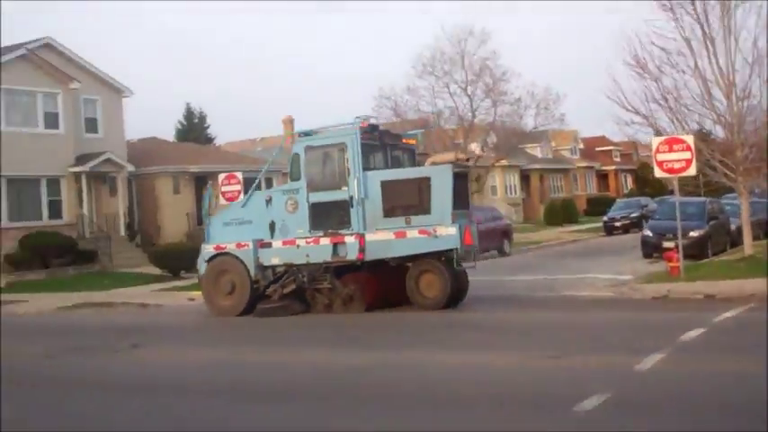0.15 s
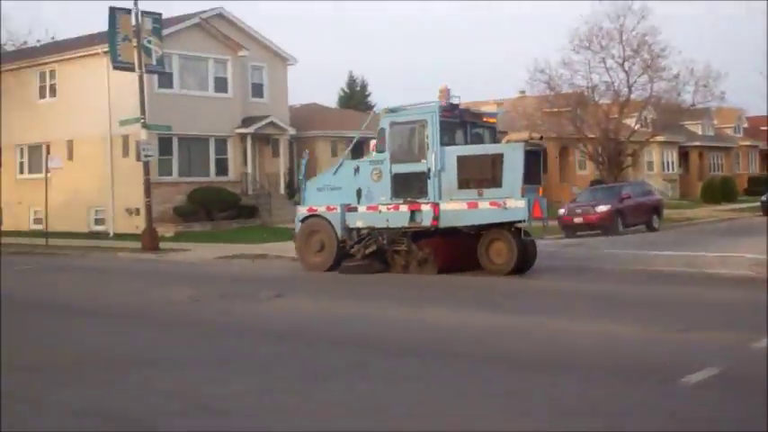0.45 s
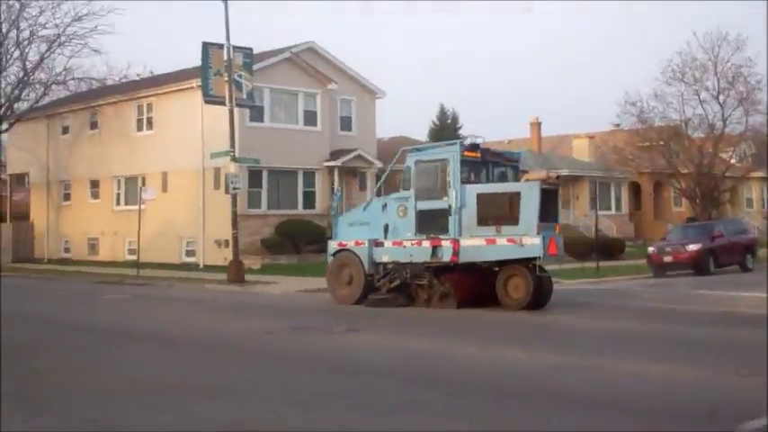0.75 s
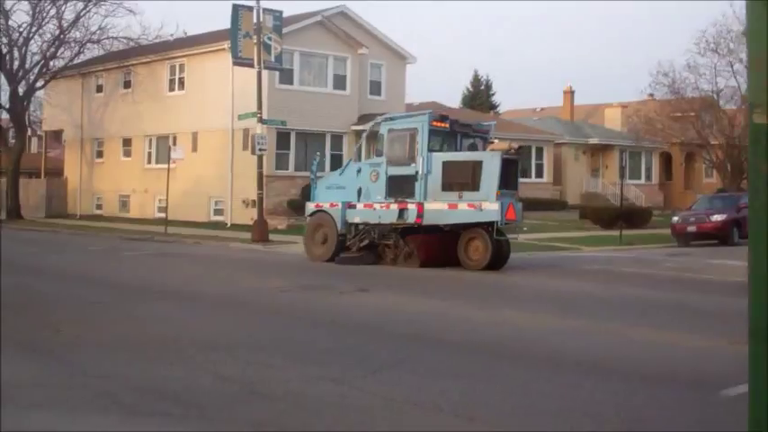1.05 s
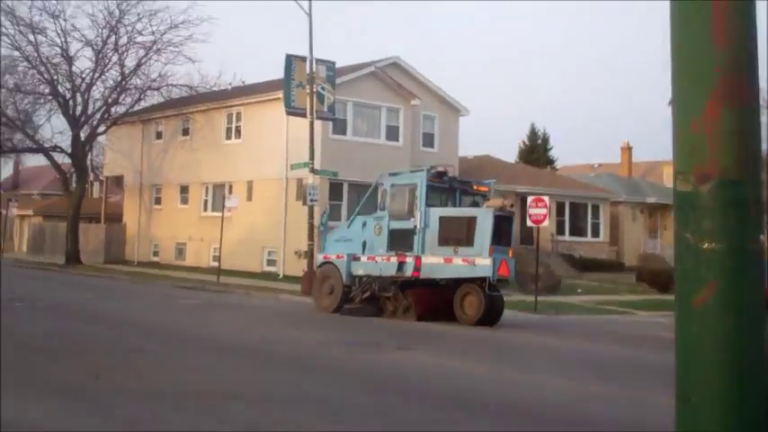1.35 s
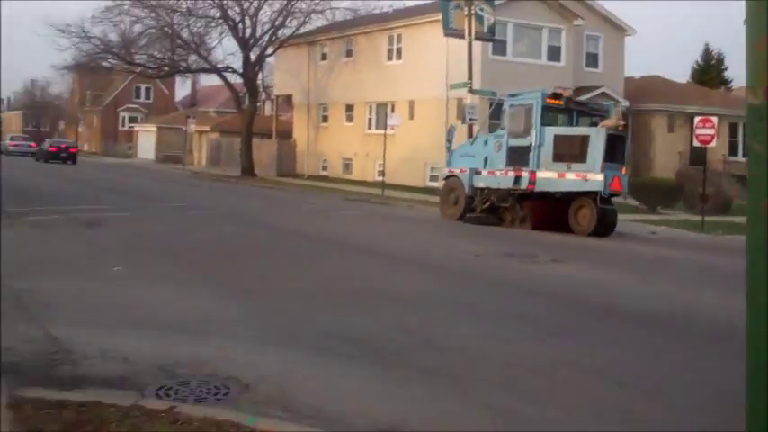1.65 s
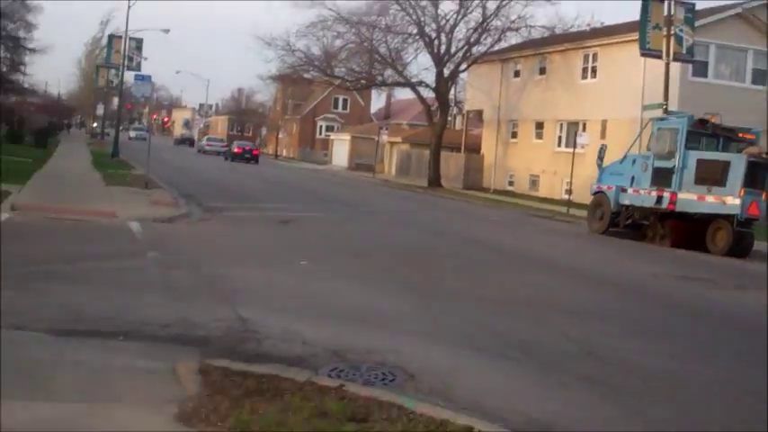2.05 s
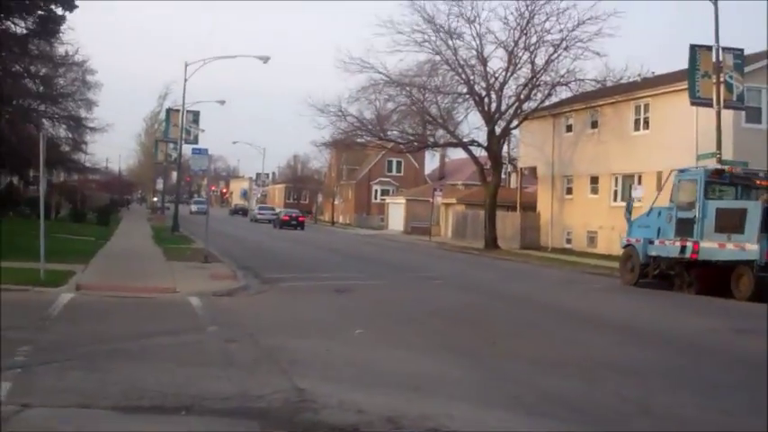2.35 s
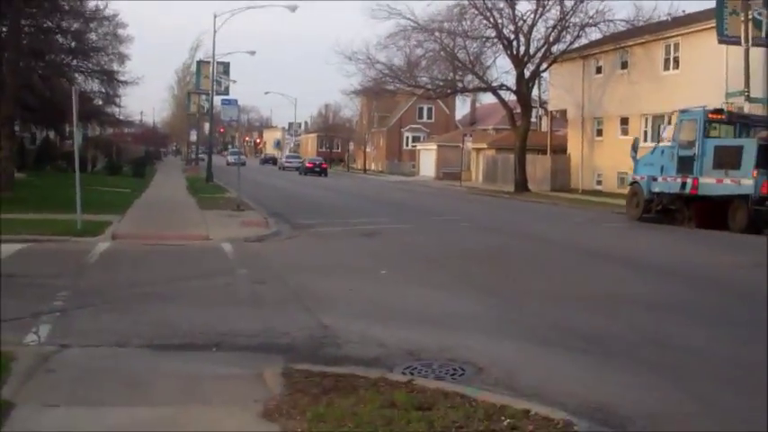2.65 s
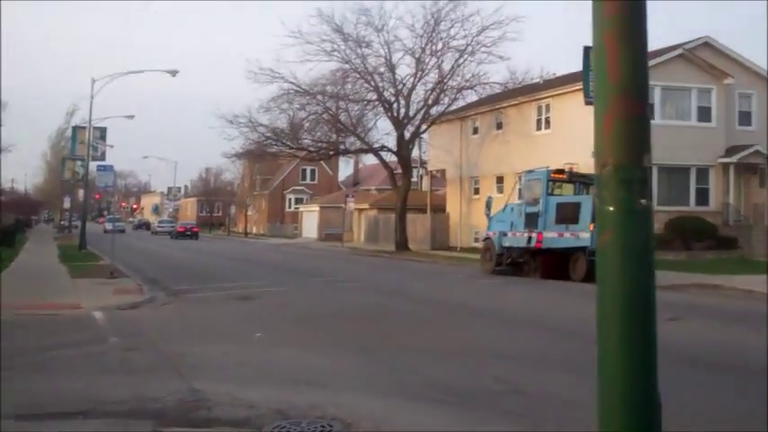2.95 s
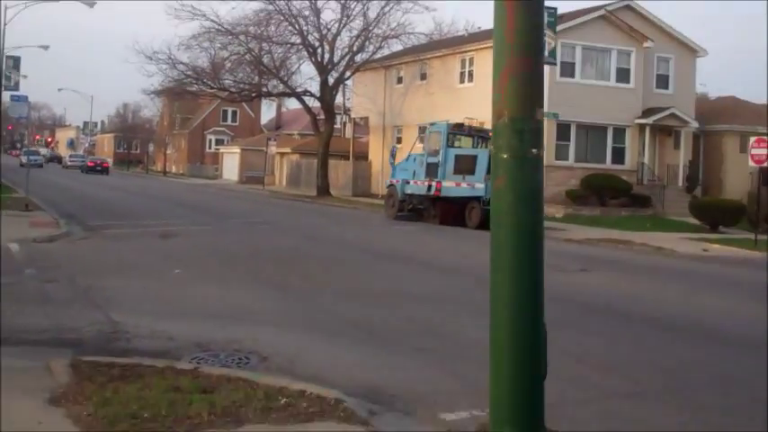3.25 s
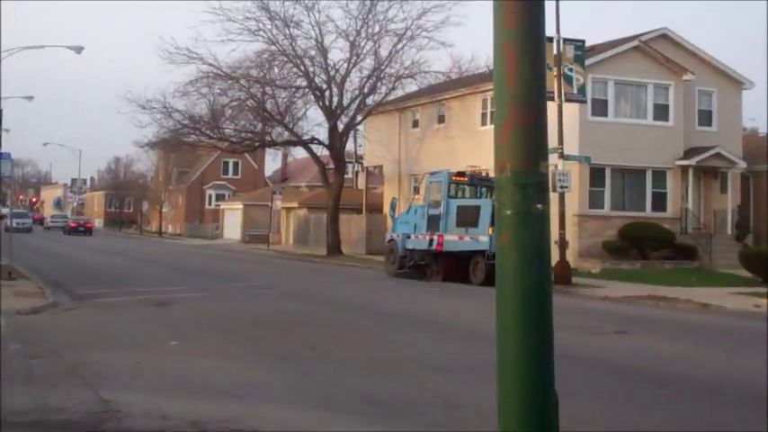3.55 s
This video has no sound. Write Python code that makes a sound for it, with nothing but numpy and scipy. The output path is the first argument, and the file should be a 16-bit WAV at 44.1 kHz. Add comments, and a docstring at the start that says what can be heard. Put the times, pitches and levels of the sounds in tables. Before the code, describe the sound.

A street sweeper scrapes along a residential street with a constant bright brush hiss over diesel drone and roar; an early engine howl fades as it turns away, with light wind bumping the stereo microphone.

```python
"""A street sweeper's spinning brushes hiss on the asphalt as it turns away, made from shaped noise and random flicks.
Under the hiss lie a steady diesel drone of wavering tones and a throbbing machine roar made of noise.
A howl from the engine housing, made of tones and airy noise, fades as the sweeper turns away.
A light wind bumps the two microphone ports with short, low puffs of noise."""
import sys
import numpy as np
from scipy import signal
from scipy.fft import rfft, irfft
from scipy.io import wavfile
from scipy.ndimage import uniform_filter1d

SR = 44100
rng = np.random.default_rng(int(sys.argv[2]) if len(sys.argv) > 2 else 0)


def transcribe(u):
    """Save the signal u as a 16-bit wav file named by the first command-line argument.

    u: samples, shape (n,) or (channels, n), limited to [-1, 1]; the rate is SR.
    q: integer samples, one column per channel.
    """
    v = np.clip(np.atleast_2d(u).T, -1, 1)
    q = np.round(v * 32767).astype(np.int16)
    wavfile.write(sys.argv[1], SR, q)


N = 163611
SIZE, HOP = 1024, 256  # length and step of the short-time frames, in samples
T = np.arange(N) / SR
FRAME_S = np.arange(N // HOP + 5) * HOP / SR
BIN_HZ = np.fft.rfftfreq(SIZE, 1 / SR)

# Engine speed and exhaust tones at 1, 2, 3 and 6 times the firing rate, before a small shared lift:
# t/s, firing rate f/Hz, then four columns of level/dB
ENGINE_SPEED_AND_TONES = [(0, 76.8, -42.0, -39, -40, -53), (0.25, 76.6, -43.0, -39.0, -46, -53.5),
                          (0.5, 76.6, -45, -38.5, -41, -47.5), (0.8, 77.47, -44.5, -42.5, -42, -46),
                          (1.05, 77.46, -43.5, -45, -43.0, -43.5), (1.25, 78.2, -48, -41.5, -47, -57.5),
                          (1.5, 78.5, -47.0, -43, -46.5, -49), (1.85, 78.65, -47, -42.5, -42, -42),
                          (2.2, 78.6, -49, -39, -37.0, -44), (2.6, 78.42, -46.5, -39.5, -41.5, -44.5),
                          (3.0, 78.23, -50, -43.0, -39.5, -42.5), (3.3, 78.4, -52.0, -43, -38, -48.5),
                          (3.65, 78.4, -56.0, -39.5, -36.0, -43)]
START_FIRING_HZ = ENGINE_SPEED_AND_TONES[0][1]
WAVER_HZ = 10.9  # how fast the engine speed and the tone levels wander


def amp(db):
    """Turns decibels into gain."""
    return 10 ** (np.asarray(db) / 20)


def unit(x):
    """Scales to an rms of 1."""
    return x / np.sqrt(np.mean(abs(x) ** 2) + 1e-20)


def curve(rows, t, column=1):
    """Reads one column of a time table, with straight lines between the rows."""
    rows = np.array(rows)
    return np.interp(t, rows[:, 0], rows[:, column])


def colour(rows, hz=BIN_HZ):
    """Reads a frequency table, with straight lines on a log-frequency axis."""
    f, value = np.transpose(rows)
    return np.interp(np.log(hz + 1), np.log(f + 1), value)


def drift(rate_hz):
    """Random wandering of rms 1, weakened above the given rate."""
    hz = np.fft.rfftfreq(N, 1 / SR)
    spectrum = rfft(rng.standard_normal(N))
    return unit(irfft(spectrum / (1 + (hz / rate_hz) ** 4), N))


def spectra(x):
    """Turns sound into short-time spectra: channels x frames x bins."""
    padded = np.pad(x, ((0, 0), (0, 2 * SIZE)))
    z = signal.stft(padded, nperseg=SIZE, noverlap=SIZE - HOP)[2]
    return z.transpose(0, 2, 1)[:, :len(FRAME_S)]


def sound(z):
    """Turns short-time spectra back into sound."""
    return signal.istft(z.transpose(0, 2, 1), nperseg=SIZE, noverlap=SIZE - HOP)[1][:, :N]


def white():
    """Short-time spectra of two unrelated white noises."""
    return spectra(rng.standard_normal((2, N)))


def patches(size):
    """Random patches of rms 1 in time and frequency; size = (frames, bins)."""
    field = rng.standard_normal((len(FRAME_S), len(BIN_HZ)))
    field = uniform_filter1d(field, size[0], axis=0)
    return unit(uniform_filter1d(field, size[1], axis=1))


def ports(hz):
    """Left and right port gains at these frequencies, with a mean of 1."""
    # Left port compared with the right: f/Hz, level difference/dB
    balance = [(60, -5), (92, -6.5), (140, -7.5), (210, -7.5), (330, -7.5), (500, -7.5), (770, -7.5),
               (1170, -5.5), (1790, -7.5), (2740, -1.5), (4180, -3), (6400, -4.5), (9780, -7),
               (15000, -8.5)]
    left = amp(colour(balance, hz))
    return 2 * np.array([left, np.ones_like(left)]) / (1 + left)


def from_sweeper(z, shape_db):
    """Colours noise, delays the left port by the moving lead, and sets a fixed likeness and balance by frequency."""
    # How alike the noise is at the two ports: f/Hz, likeness (1 = the same)
    likeness = [(50, 1), (200, 0.89), (700, 1), (1400, 0.75), (2200, 0.62), (2900, 1), (3800, 0.78),
                (5000, 0.64), (7000, 0.65), (10000, 0.7), (13500, 0.47)]
    # Direction of the sweeper: t/s, lead of the right port/samples
    bearing = [(0, 0), (.15, -0.3), (.47, -0.2), (.58, 0.5), (.8, 0.67), (1.55, 0.66), (2.0, 2.2), (2.3, 2),
               (2.78, 2.5), (3.25, .5), (3.71, .5)]
    same = np.clip(colour(likeness), 0, 1)
    lead = curve(bearing, FRAME_S)[:, None]
    delay = np.exp(-2j * np.pi * BIN_HZ / SR * lead)
    right = z[0]
    left = delay * (same * z[0] + np.sqrt(1 - same ** 2) * z[1])
    pair = np.array([left, right])
    return sound(pair * unit(amp(shape_db)) * ports(BIN_HZ)[:, None])


def tone(turns, multiple, level_db, locked=False):
    """A wavering tone at a multiple of the firing rate; locked tones crest together at each firing."""
    start = 0 if locked else rng.random()
    wave = np.sqrt(2) * np.cos(2 * np.pi * (multiple * turns + start))
    wavering_db = level_db + 0.7 * drift(WAVER_HZ)
    return ports(np.array([multiple * START_FIRING_HZ])) * wave * amp(wavering_db)


def wind():
    """Air bumps the two ports in short, low puffs of unrelated noise."""
    # Puffs: centre t/s, length/s, left level/dB, right level/dB
    gusts = [(0.365, 0.11, -47, -51), (.58, 0.072, -39, -40), (1.845, 0.11, -40, -45),
             (1.998, 0.068, -45, -31.5), (2.182, .07, -33.5, -44), (2.23, .12, -35.5, -35.5),
             (2.418, .18, -39.5, -38), (2.516, .08, -41, -36), (2.736, 0.041, -28, -38),
             (3.04, 0.095, -40, -37), (3.22, .1, -37, -38), (3.49, 0.19, -42, -33)]
    # Colour of the puffs: f/Hz, relative level/dB
    gust_colour = [(25, -38), (60, -3), (130, 0.5), (220, 2.5), (340, 2), (580, -14.5), (900, -16),
                   (2500, -38)]
    power = 0
    for centre, length, left, right in gusts:
        puff = np.exp(-2 * ((T - centre) / length) ** 2)
        power = power + (amp([[left], [right]]) * puff) ** 2
    return sound(white() * unit(amp(colour(gust_colour)))) * np.sqrt(power)


def howl(turns):
    """Harmonics of the four-stroke cycle and rushing air pass one resonance of the engine housing."""
    # Rise and fall of the howl, before each part's own offset: t/s, level/dB
    howl_level = [(0, -38.5), (.12, -37.5), (.45, -38), (.7, -44.5), (1.12, -41), (1.25, -50), (1.4, -44.5),
                  (1.8, -58.5), (3.71, -52)]
    # Resonance of the housing: f/Hz, relative level/dB
    resonance = [(300, -36), (520, -15), (590, -6), (690, -1), (750, -14), (830, -20), (1500, -40)]
    cylinders, main_multiple = 4, 9
    main_db, comb_db, air_db = -4, -3.5, -1  # offsets of the three parts
    level_db = curve(howl_level, T)

    # One four-stroke cycle holds one firing per cylinder, so its harmonics fall on quarter multiples.
    multiples = np.arange(28, 42) / cylinders
    multiples = multiples[multiples != main_multiple]
    shape_db = colour(resonance, multiples * START_FIRING_HZ)
    shape_db = shape_db - 20 * np.log10(np.linalg.norm(amp(shape_db)))
    comb = sum(tone(turns, k, level_db + comb_db + db) for k, db in zip(multiples, shape_db))

    air = from_sweeper(white(), colour(resonance)) * amp(level_db + air_db)
    return comb + air + tone(turns, main_multiple, level_db + main_db)


def roar(turns, throb=.14, patchy_db=1.1):
    """Machinery noise throbs with the firings and the crankshaft, and is deeper from behind."""
    # Rise and fall of the roar, before a shared lift: t/s, level/dB
    roar_level = [(0, -35), (.5, -36.5), (1.0, -37.5), (1.5, -39), (1.65, -37), (1.9, -39.5), (2.0, -35.5),
                  (2.1, -38.5), (2.45, -37), (2.65, -40), (2.82, -35), (2.92, -43.5), (3.02, -38),
                  (3.38, -38), (3.5, -34), (3.71, -37.5)]
    # Roar heard beside the machine: f/Hz, relative level/dB
    side_colour = [(30, -44), (70, -6), (130, 0), (260, 0), (390, -2), (520, -5), (850, 2), (1050, 0),
                   (1420, 1.5), (1650, -1), (2100, 0.5), (2600, -1), (5000, -9), (14000, -41)]
    # Roar heard behind the machine: f/Hz, relative level/dB
    rear_colour = [(30, -40), (70, -8), (130, 3.5), (260, 4), (400, 1.5), (620, 4), (830, -6.5), (1000, 0),
                   (1350, 2), (1600, -2.5), (1850, 3), (2400, -3), (5000, -13), (14000, -45)]
    lift_db, turn_start_s, turn_end_s = 3, 0.9, 2.6
    behind = np.clip((FRAME_S - turn_start_s) / (turn_end_s - turn_start_s), 0, 1)[:, None]
    shape_db = (1 - behind) * colour(side_colour) + behind * colour(rear_colour)
    shape_db = shape_db + patchy_db * patches(size=(16, 6))
    # The crankshaft turns once for every two firings.
    beat = 1 + throb * (np.cos(2 * np.pi * turns) + np.cos(np.pi * turns)) / 2
    throbbing = spectra(unit(beat * rng.standard_normal((2, N))))
    return from_sweeper(throbbing, shape_db) * amp(lift_db + curve(roar_level, T))


def engine(turns):
    """Diesel drone: exhaust pulses made of strong harmonics, and weaker tones from uneven cylinders."""
    # Strong exhaust tones: multiples of the firing rate
    strong_multiples = (1, 2, 3, 6)
    # Weak tones: multiple of the firing rate, level at the start/dB, level at the end/dB
    weak_tones = [(2.5, -53, -62), (3.5, -52, -48), (4, -58, -53), (7.5, -48, -69), (12, -58.5, -54.5),
                  (18, -69, -47), (23, -66, -50)]
    lift_db = 0.4
    drone = 0
    for column, multiple in enumerate(strong_multiples, start=2):
        level_db = curve(ENGINE_SPEED_AND_TONES, T, column) + lift_db
        drone = drone + tone(turns, multiple, level_db, locked=True)
    for multiple, start_db, end_db in weak_tones:
        drone = drone + tone(turns, multiple, np.linspace(start_db, end_db, N))
    return drone


def brushes(patchy_db=.5, flutter_db=0.36, flutter_hz=25):
    """Countless bristles scrape the asphalt as a hiss; some flick harder."""
    # Brush contact with the road: t/s, relative level/dB
    contact = [(0, 1), (.03, 2), (.11, 2), (.28, 1.5), (.4, 3), (.47, 4), (.57, 1.2), (.79, 0), (.9, 1.3),
               (.98, 0.3), (1.05, -1.6), (1.26, 0.6), (1.45, -.3), (1.78, 0.8), (1.9, -0.2), (2.05, 0.3),
               (2.32, 0.5), (2.5, 0.5), (2.59, 2.8), (2.7, -1.4), (2.85, 1), (3.17, -1.1), (3.28, 1),
               (3.41, -2.5), (3.56, 1), (3.71, 0.5)]
    # Colour of the hiss: f/Hz, relative level/dB
    hiss_colour = [(500, -23), (1500, -13), (2400, -12), (3000, -5.5), (3800, -3), (4700, -2.5), (6000, -4),
                   (8000, -3.5), (10000, -4), (12000, -2.5), (14300, -2)]
    # Changes in the top treble: t/s, relative level/dB
    top_treble = [(0, 6), (.1, -1), (.3, 2), (.47, 3), (.65, -0.5), (1.0, 2), (1.9, -0.1), (2.8, 0.1),
                  (3.71, 2)]
    hiss_db, flicks_db = -24.5, -34.5  # before the contact curve and flutter
    flicks_per_s, spread_db = 2500, 1.5  # per channel; scale of the random flick sizes
    top_from_hz, top_full_hz = 6100, 13000

    sizes = amp(spread_db * np.minimum(rng.exponential(1, (2, N)), 4))
    happens = rng.random((2, N)) < flicks_per_s / SR
    flicks = unit(sizes * rng.choice([-1, 1], (2, N)) * happens)
    scrape = amp(hiss_db) * white() + amp(flicks_db) * spectra(flicks)

    top_share = np.interp(BIN_HZ, [top_from_hz, top_full_hz], [0, 1])
    top_db = curve(top_treble, FRAME_S)[:, None] * top_share
    shape_db = colour(hiss_colour) + top_db + patchy_db * patches(size=(16, 24))
    return from_sweeper(scrape, shape_db) * amp(curve(contact, T) + flutter_db * drift(flutter_hz))


def scene():
    """Adds the sweeper's parts and the wind; one turn is one firing of the engine."""
    jitter = 0.00284  # rms wander of the engine speed, as a fraction
    firing_hz = curve(ENGINE_SPEED_AND_TONES, T) * (1 + jitter * drift(WAVER_HZ))
    turns = np.cumsum(firing_hz) / SR
    return wind() + howl(turns) + roar(turns) + engine(turns) + brushes()


def record(dry):
    """The recorder's steep band limit removes the highest treble."""
    edge_hz = 14300
    taps = signal.firwin(1023, edge_hz, window=("kaiser", 8), fs=SR)
    return signal.oaconvolve(dry, taps[None], "same")


dry = scene()
out = record(dry)
transcribe(out)
```